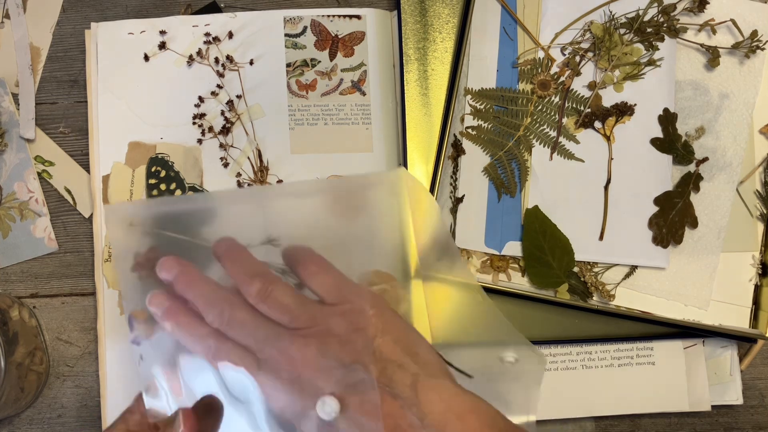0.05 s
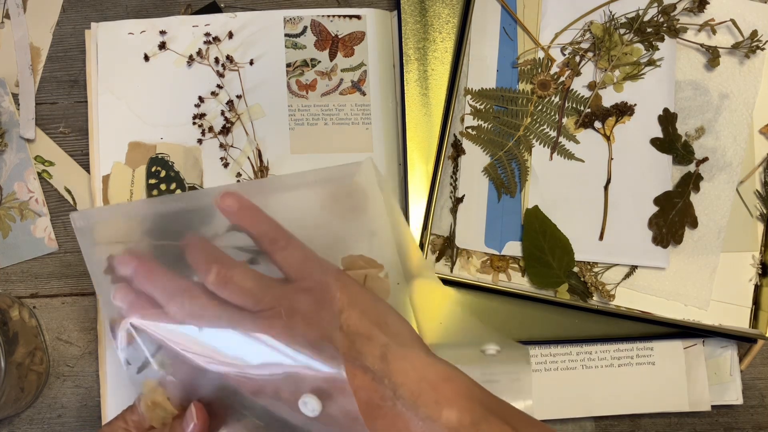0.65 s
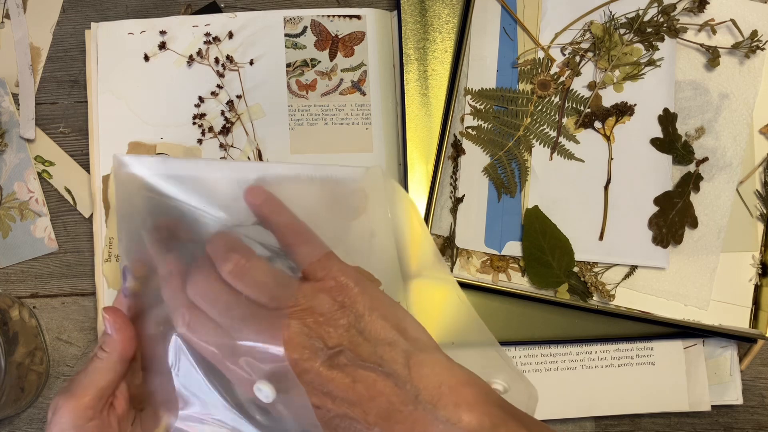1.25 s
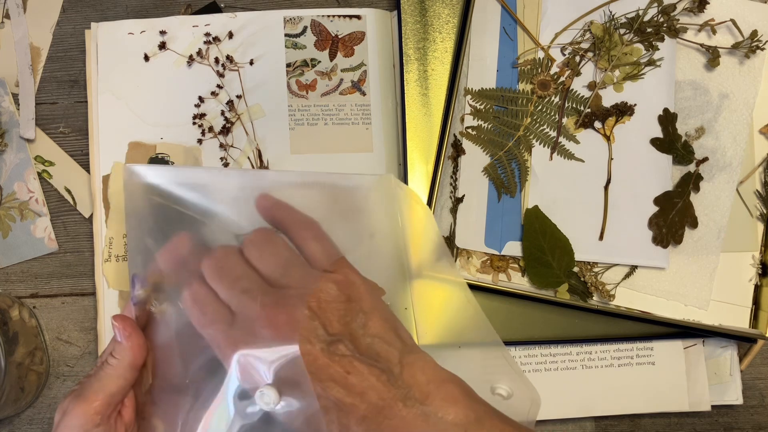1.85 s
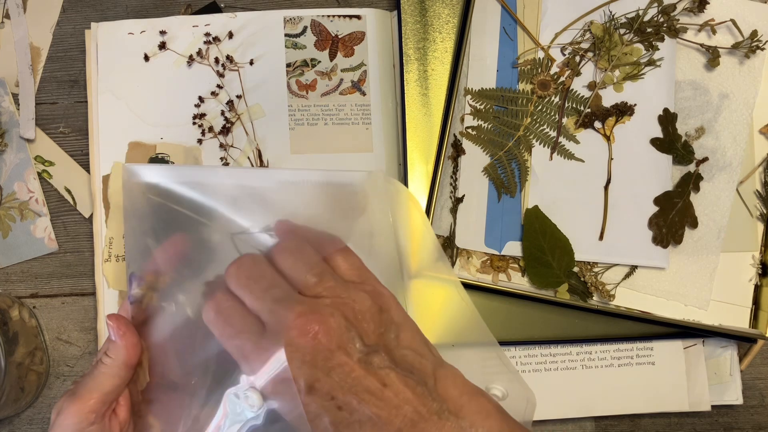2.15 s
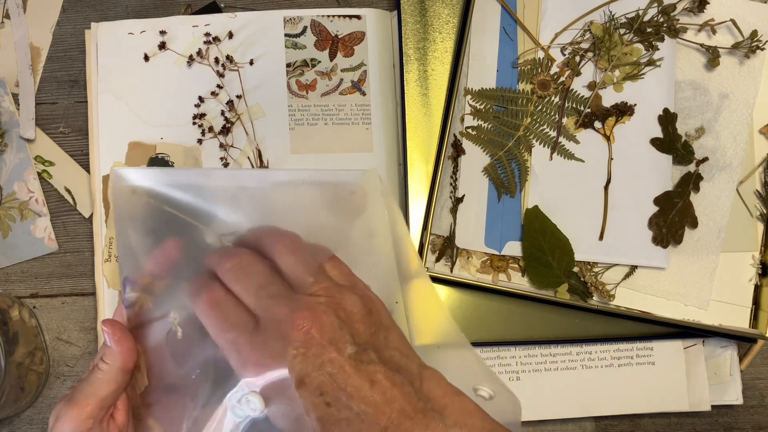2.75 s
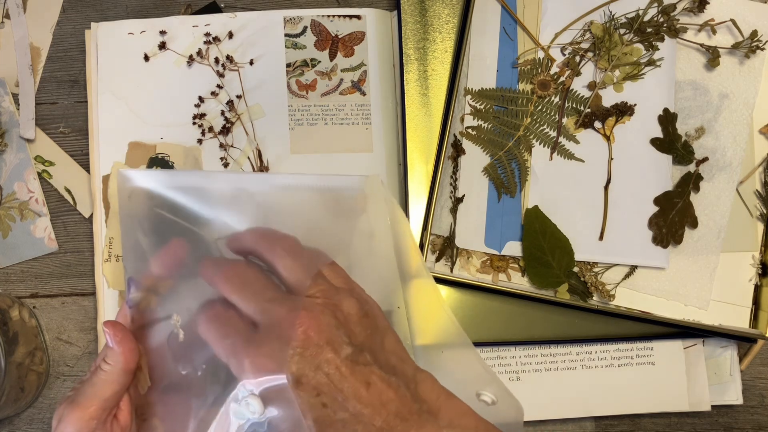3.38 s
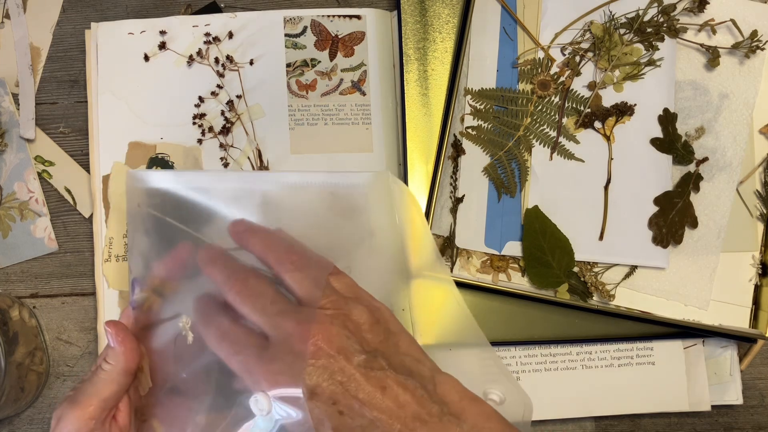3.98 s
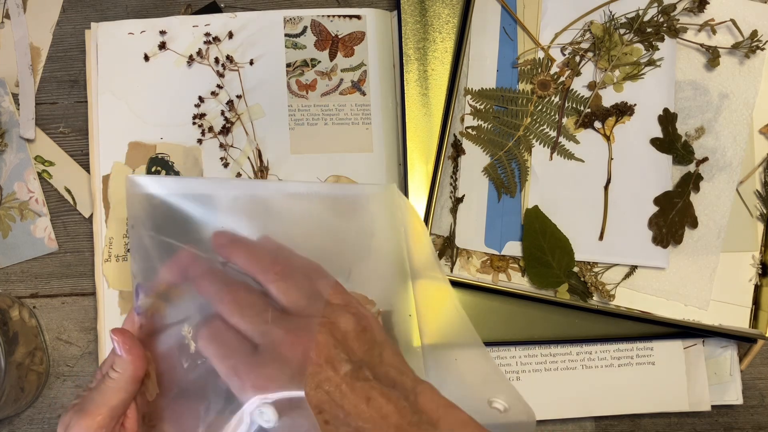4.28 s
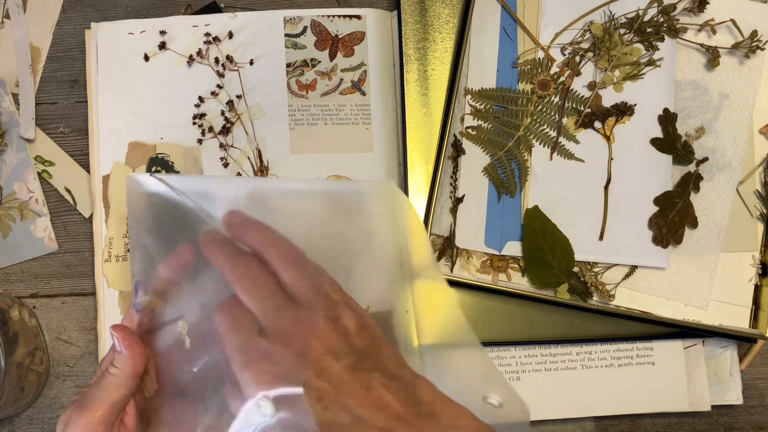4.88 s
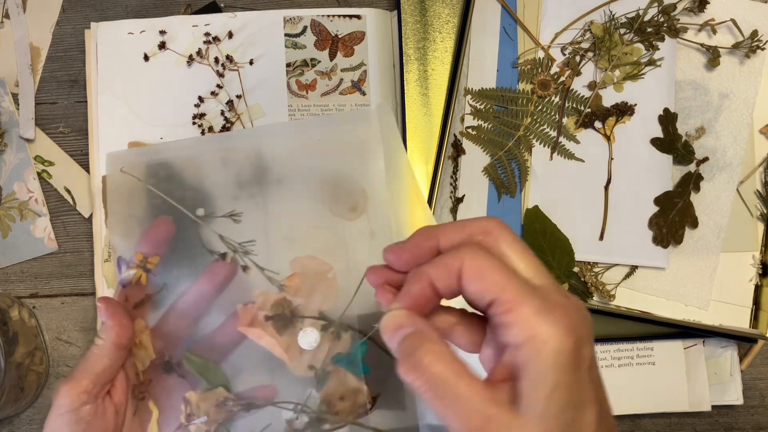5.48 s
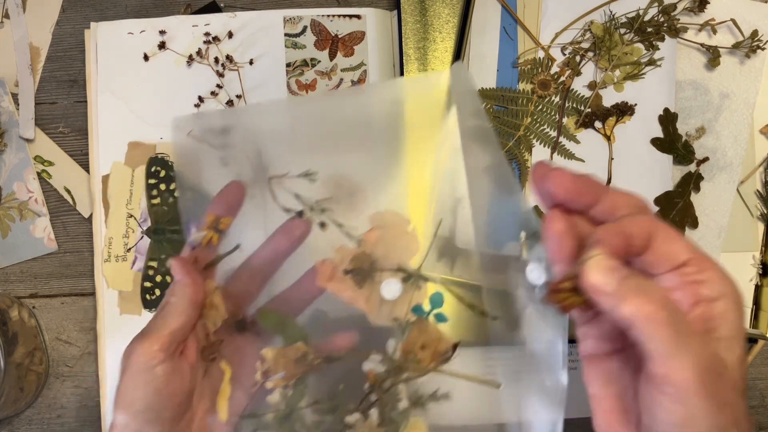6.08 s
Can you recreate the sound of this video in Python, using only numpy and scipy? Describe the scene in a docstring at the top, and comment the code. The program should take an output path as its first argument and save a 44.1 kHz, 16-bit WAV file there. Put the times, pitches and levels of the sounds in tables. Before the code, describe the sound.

Fingers slide around inside a plastic pouch, making a soft grainy hiss, sharp pops, dull taps and the brittle crackle of dried flowers.

```python
"""A stiff plastic sleeve rustles and pops as a hand feels for the dried flowers inside it.
Skin slides over the sheet in tiny slips, a grainy hiss. Dents snap through with sharp pops,
fingers land with dull taps, whole panels give a low wobble, and dry stems and petals crackle.
The table adds a hollow flutter echo and the small quiet room answers briefly.
Two closely spaced microphones listen from above."""
import sys
import numpy as np
from scipy import signal
from scipy.fft import rfft, irfft, next_fast_len
from scipy.io import wavfile
from scipy.ndimage import uniform_filter1d, map_coordinates

SR = 44100
rng = np.random.default_rng(int(sys.argv[2]) if len(sys.argv) > 2 else 0)


def store_wav(level_fs):
    """Save 16-bit WAV to argv[1]."""
    pcm = np.round(np.clip(np.atleast_2d(level_fs), -1, 1) * 32767)
    wavfile.write(sys.argv[1], SR, pcm.T.astype(np.int16))


N = 270333

# The sheet buckles. Each row: start in seconds, relative level in dB, dent pitch in Hz,
# thud offset in dB, crack offset in dB, crack pitch in Hz.
BUCKLES = [(0.054, -30.5, 1240, -12.5, -32, 2980), (0.081, -32, 1900, -7.5, -10, 3980),
           (0.238, -35, 1780, -6.5, -12.5, 2600), (0.299, -41.5, 1390, -3.5, -26, 3000),
           (0.373, -28.5, 2130, -7, -0.5, 3000), (0.3766, -24, 1400, -6, -8, 2500),
           (0.435, -15, 1480, -13, -3.5, 4930), (0.610, -29.5, 1390, -12, -22, 2000),
           (0.723, -37.5, 1270, -2.5, -6, 2470), (0.774, -34.5, 1490, -16, -4, 2350),
           (0.8624, -24, 1170, -16.5, -15, 2900), (0.8635, -28, 1840, -20, -15, 2880),
           (1.509, -24.5, 1740, -21.5, -10.5, 2500), (1.6233, -19.5, 1200, -7.5, -6, 3830),
           (1.755, -44, 1120, -5, -0.5, 2820), (1.795, -26.5, 1550, -14, -1, 3530),
           (2.097, -29, 1175, -10.5, -9, 2720), (2.241, -46.5, 1410, -7.5, -7, 2800),
           (2.3048, -24, 1106, -11, -6, 2600), (2.395, -32, 1110, -6.5, -21, 3000),
           (2.5124, -31, 1147, -16, -9.5, 2520), (2.795, -31, 1090, -22, -13, 1900),
           (2.952, -37.5, 1660, -12, -20.5, 2340), (3.107, -47, 1150, -8.5, -19, 2000),
           (3.164, -50, 1330, -1.5, -2.5, 3680), (3.243, -52.5, 1110, -10, -3, 3300),
           (3.2735, -31.5, 1680, -18, -11, 3330), (3.989, -38, 1230, -7, -15, 2940),
           (4.059, -47, 1100, -6.5, -21, 4200), (4.163, -47, 1570, -7, -15.5, 4100),
           (4.7648, -23, 1155, -18.5, -18, 3470), (4.793, -33, 1730, -11, -16.5, 2530),
           (5.14, -40.5, 2010, -13, -16, 3000), (5.182, -43, 1460, -4, -3.5, 4420),
           (5.232, -36, 865, -1, -5.5, 2460), (5.245, -45, 1850, -10, -2, 2470),
           (5.271, -52, 1070, 7, 11.5, 2800), (6.073, -43, 1430, -14.5, -5.5, 4070)]
# The bright colour of cracking plastic. Each row: frequency in Hz, gain in dB.
CRACK_SPECTRUM = [(600, -15), (1600, 1), (2600, -1), (4700, 0), (6500, -1.5), (9000, -11.5), (11000, -14.5),
                  (16000, -19.5)]


def amp(db):
    """Decibels to gain."""
    return 10 ** (np.asarray(db) / 20)


def unit(x):
    """Scale to rms 1."""
    return x / np.sqrt(np.mean(x ** 2) + 1e-20)


def sized(x):
    """Scale a short sound to the energy of one millisecond at full level."""
    return x / np.sqrt(np.sum(x ** 2) / len(x) / (SR / 1000) + 1e-20)


def along(points, hz):
    """Read (Hz, value) points on a log frequency axis."""
    knots_hz, values = np.transpose(points)
    return np.interp(np.log(hz + 1), np.log(knots_hz + 1), values)


def wobble(rate):
    """A smooth random curve, rate knots a second."""
    knots = rng.standard_normal(int(N * rate / SR) + 4)
    return map_coordinates(knots, [np.arange(N) * rate / SR])


def filtered(x, response):
    """Pass x through a complex response of frequency."""
    n = x.shape[-1]
    padded = next_fast_len(n + 4096, real=True)
    return irfft(rfft(x, padded) * response(np.fft.rfftfreq(padded, 1 / SR)), padded)[..., :n]


def causal(db):
    """The minimum-phase response with these gains: nothing sounds before the blow."""
    cepstrum = irfft(np.log(amp(db) + 1e-6))
    half = len(cepstrum) // 2
    cepstrum[1:half] *= 2
    cepstrum[half + 1:] = 0
    return np.exp(rfft(cepstrum))


def resonance(hz, centre, q):
    """One damped resonance."""
    return 1j * hz * centre / q / (centre ** 2 - hz ** 2 + 1j * hz * centre / q)


def pair(two):
    """Two unrelated signals become a left and right that are partly alike."""
    # Stereo likeness. Each row: frequency in Hz, left-right correlation.
    likeness = [(100, .99), (500, .92), (850, .7), (1300, .88), (2400, .7), (3400, .25), (4500, .65),
                (5700, .9), (6800, .65), (8500, .97), (10100, .6), (11700, .97), (13300, .45), (14500, .97)]
    turn = lambda hz: np.arccos(np.clip(along(likeness, hz), 0, 1)) / 2
    mid, side = filtered(two, lambda hz: np.array([np.cos(turn(hz)), np.sin(turn(hz))]))
    return np.array([mid + side, mid - side])


def add(track, start_s, sound):
    """Mix a sound into the track."""
    start = round(start_s * SR)
    sound = sound[:, max(0, -start):]
    part = track[:, max(0, start):][:, :sound.shape[1]]
    part += sound[:, :part.shape[1]]


def grains(n, rate, spread_db):
    """Two trains of tiny slips at random moments, a few much larger than the rest."""
    size = amp(spread_db * np.minimum(rng.exponential(size=(2, n)), 5))
    slipping = rng.random((2, n)) < rate / SR
    return unit(slipping * size * rng.choice([-1, 1], (2, n)))


def drag_levels(halt_half_width_s=0.026):
    """Rub and hiss envelopes of the back of the hand, dragging along the sleeve and halting."""
    # Each row: time in seconds, relative rub in dB, relative hiss in dB.
    drag = [(0.0, -59.5, -60.5), (0.8, -59.5, -62), (0.94, -63, -61.5), (1.019, -70, -71.5),
            (1.19, -69.5, -68), (1.72, -62.5, -61), (1.91, -69.5, -63.5), (2.059, -68, -66.5),
            (2.75, -70.5, -70.5), (3.28, -72.5, -72.5), (3.94, -79, -69), (4.13, -68.5, -68.5),
            (4.76, -68, -66), (4.93, -60.5, -60.5), (5.03, -59, -63.5), (5.16, -58.5, -62),
            (5.261, -70.5, -60), (5.38, -72, -71.5), (5.47, -101, -85), (5.54, -105, -108),
            (5.8, -92.5, -100), (5.92, -75, -84.5), (6.13, -63, -59)]
    # Halts between pushes. Each row: centre in seconds, dip in dB.
    halts = [(0.222, 10.5), (2.169, 6), (2.49, 8), (3.03, 5.5), (3.454, 11.5), (3.82, 6.5), (4.69, 8.5)]
    t = np.arange(N) / SR
    times, *levels = np.transpose(drag)
    dip_db = sum(db * np.exp(-((t - at) / halt_half_width_s) ** 2) for at, db in halts)
    return [amp(np.interp(t, times, db) - dip_db) for db in levels]


def move_level(moves, attack_s=0.043, sag_db=4, release_s=0.0055):
    """Envelope of hand movements: each takes hold, slackens over its length and lets go."""
    t, power = np.arange(N) / SR, np.zeros(N)
    for start, length, db in moves:
        rise = np.sin(np.pi / 2 * np.clip((t - start) / attack_s, 0, 1)) ** 2
        hold = amp(db - sag_db * np.clip((t - start) / length, 0, 1))
        fall = np.exp(-np.clip((t - start - length) / release_s, 0, 20))
        power += (hold * rise * fall) ** 2
    return np.sqrt(power)


def jolt_level(levels_db, rise_s=0.0067, fall_s=0.026):
    """Envelope of the sheet stirring just before each pop and settling after it."""
    out, t = np.zeros((1, N)), np.arange(-SR // 10, SR // 4) / SR
    swell = np.exp(np.minimum(t / rise_s, -t / fall_s))[None]
    for (start, *_), db in zip(BUCKLES, levels_db):
        add(out, start + t[0], amp(db) * swell)
    return out[0]


def bending_colour(x, depth_db):
    """The sheet's resonances wander as it bends: patches of pitch swell and fade."""
    spectra = signal.stft(x, nperseg=512)[2]
    patches = uniform_filter1d(rng.standard_normal(spectra.shape[1:]), size=4, axis=0)
    patches = uniform_filter1d(patches, size=9, axis=1)
    return signal.istft(spectra * amp(depth_db * unit(patches)), nperseg=512)[1][:, :N]


def friction(spectrum, rate, spread_db, tremble_db, patchy_db):
    """Dense slips coloured by the sheet; the contact pressure trembles."""
    slips = bending_colour(pair(grains(N, rate, spread_db)), patchy_db)
    coloured = filtered(slips, lambda hz: causal(along(spectrum, hz)))
    return unit(coloured * amp(tremble_db * wobble(rate=49)))


def hand_rustle(rub_pivot_db=-54, rub_growth=1.4):
    """Skin slides on matt plastic, creases tick as it passes, the sleeve shifts in the other hand."""
    # Finger pushes and shifts of the whole sleeve.
    # Each row: start in seconds, length in seconds, relative level in dB.
    finger_pushes = [(0.37, .11, -52.5), (0.78, 0.19, -57.5), (1.08, .06, -60), (1.47, 0.07, -52),
                     (1.88, .22, -67), (2.52, 0.16, -66.5), (2.77, .10, -62.5), (2.94, .04, -57.5),
                     (3.07, .05, -63), (3.18, .21, -67.5), (3.47, .24, -63), (3.89, .09, -58.5),
                     (4.06, .09, -58), (4.21, .06, -62.5), (4.30, .06, -62), (4.41, .11, -59),
                     (5.22, .08, -56), (5.96, .05, -59)]
    sleeve_shifts = [(-0.03, 0.058, -47.5), (0.38, 0.079, -65), (0.48, 0.4, -68.5), (1.63, 0.053, -51),
                     (2.215, 0.052, -56.5), (2.51, 0.075, -56), (4.93, 0.37, -65), (4.995, 0.033, -54.5),
                     (5.02, 0.186, -62.5), (5.105, .042, -53.5), (5.22, 0.1, -57.5), (5.96, 0.029, -49.5),
                     (6.08, 0.055, -61)]
    # Low handling noise, midrange rub and bright hiss. Each row: frequency in Hz, gain in dB.
    handling_spectrum = [(25, -43), (60, -11.5), (100, 0.5), (170, -1.5), (300, 5), (520, -1), (800, -2.5),
                         (1500, -19), (4000, -74)]
    rub_spectrum = [(200, -53.5), (600, -14.5), (880, -3), (1100, 2.5), (1800, 3), (2300, 0.5), (3400, -1),
                    (5000, -4.5), (8000, -12), (16000, -42.5)]
    hiss_spectrum = [(1000, -35), (3000, -3), (4400, 1), (5500, -5.5), (7200, 3.5), (10300, 0),
                     (12000, -10.5), (14000, -3.5)]
    handling = friction(handling_spectrum, rate=1200, spread_db=2.5, tremble_db=3, patchy_db=3)
    rub = friction(rub_spectrum, rate=4400, spread_db=1, tremble_db=0, patchy_db=5)
    creases = friction(rub_spectrum, rate=280, spread_db=1.5, tremble_db=0, patchy_db=7.5)
    ticks = friction(CRACK_SPECTRUM, rate=1200, spread_db=3, tremble_db=3.5, patchy_db=4)
    hiss = friction(hiss_spectrum, rate=8000, spread_db=2.4, tremble_db=1.4, patchy_db=2.1)

    drag_rub, drag_hiss = drag_levels()
    push, shift = move_level(finger_pushes), move_level(sleeve_shifts)
    # A harder push raises the rub faster than the hiss.
    pressed = amp(rub_pivot_db) * (push / amp(rub_pivot_db)) ** rub_growth
    _, pop_db, _, thud_db, crack_db, _ = np.transpose(BUCKLES)
    together = lambda *levels: np.sqrt(sum(level ** 2 for level in levels))
    handling_level = together(shift, amp(-24) * drag_rub, amp(-23) * jolt_level(pop_db + thud_db))
    rub_level = together(pressed, drag_rub, amp(-3) * shift, amp(-33) * jolt_level(pop_db))
    hiss_level = together(push, amp(1.5) * drag_hiss)
    tick_level = together(amp(-20) * jolt_level(pop_db + crack_db), amp(-9) * shift)
    return (amp(-1) * handling_level * handling
            + rub_level * (rub + amp(-5) * creases)
            + amp(1) * hiss_level * hiss
            + tick_level * ticks)


def blow(t, t60, run_db=-4, run_rise_s=0.0012, creak_db=-22, creak_rise_s=0.004):
    """The sheet creaks under load, snaps at t = 0, and a ragged run of smaller creases follows."""
    after = np.maximum(t, 0)
    slips = pair(grains(len(t), rate=5000, spread_db=2))
    run = slips * amp(-60 * after / t60) * (1 - np.exp(-after / run_rise_s))
    creak = slips * (t < 0) * np.exp(-np.abs(t) / creak_rise_s)
    return ((t == 0) + amp(run_db) * run / np.linalg.norm(run[0])
            + amp(creak_db) * creak / np.linalg.norm(creak[0]))


def dent_tone(hz, pitch, crack_db):
    """A dent rings around its pitch; a soft one is rounder, a sharp one wakes a higher mode."""
    cutoff_hz = 3.8 * pitch * amp(0.2 * crack_db)
    rolloff = causal(-10 * np.log10(1 + (hz / cutoff_hz) ** 10))
    main_mode = resonance(hz, pitch, q=2.13) ** 2 * rolloff
    upper_mode = resonance(hz, 1.65 * pitch, q=4) ** 2
    return main_mode + np.minimum(amp(crack_db + 3), 0.6) * upper_mode


def snap_tone(hz, spectrum, pitch, q, boost_db):
    """A broad snap with one short resonance standing out of it."""
    return causal(along(spectrum, hz)) * (1 + amp(boost_db) * resonance(hz, pitch, q))


def pops_and_taps(dispersion=0.0462, dent_lag_s=0.0013, crack_lag_s=0.0013):
    """Dents snap through with a ring, a thud and a crack; finger taps are the same with less crack."""
    # Fingers bump the sleeve. Each row: start in seconds, relative level in dB.
    taps = [(0.001, -33), (0.114, -27.5), (0.547, -49.5), (1.23, -48.5), (1.617, -40), (1.674, -44),
            (1.94, -53), (2.09, -45.5), (2.223, -57.5), (2.292, -32.5), (2.65, -50.5), (2.788, -47),
            (3.732, -66), (3.934, -45.5), (4.129, -55.5), (5.027, -43.5), (5.054, -50.5)]
    tap_hz, tap_thud_db, tap_crack_db, tap_crack_hz = 1061, -2.5, -28, 3000
    tap_rows = [(*tap, tap_hz, tap_thud_db, tap_crack_db, tap_crack_hz) for tap in taps]
    # The dull body of each hit. Each row: frequency in Hz, gain in dB.
    thud_spectrum = [(25, -35), (60, -13.5), (150, -11), (330, -3.5), (530, 3.5), (750, 0), (1200, -24.5),
                     (3000, -76)]
    lead_in = SR // 40
    out, t = np.zeros((2, N)), (np.arange(SR // 7) - lead_in) / SR
    # Bending waves travel slower at low pitch, so each pop falls in pitch.
    chirp = lambda hz: np.exp(-2j * np.pi * dispersion * 2 * (np.sqrt(hz) - hz / np.sqrt(2 * SR)))
    for start, db, pitch, thud_db, crack_db, crack_hz in BUCKLES + tap_rows:
        dent = filtered(blow(t, t60=0.035), lambda hz: dent_tone(hz, pitch, crack_db) * chirp(hz))
        thud = filtered(blow(t, t60=0.071), lambda hz: causal(along(thud_spectrum, hz)) * chirp(hz))
        crack = filtered(blow(t, t60=0.016),
                         lambda hz: snap_tone(hz, CRACK_SPECTRUM, crack_hz, q=8.7, boost_db=16.5))
        at = start + dent_lag_s - lead_in / SR
        add(out, at, amp(db) * sized(dent) + amp(db + thud_db + 1) * sized(thud))
        add(out, at + crack_lag_s, amp(db + crack_db - 1) * sized(crack))
    return out


def panel_flexes(t60=0.094, rise_s=0.0054, gain_db=8):
    """A wide panel of the sleeve is shaken unevenly and wobbles around its own low pitch."""
    # Each row: start in seconds, relative level in dB, pitch in Hz.
    flexes = [(0.009, -48.5, 145), (0.407, -44, 86), (1.65, -52.5, 178), (1.676, -51, 287),
              (1.801, -44.5, 248), (2.553, -50, 355), (3.171, -62, 271), (3.744, -76, 188),
              (3.955, -58, 357), (4.17, -68, 119), (4.794, -50, 280), (5.2, -58, 91), (5.289, -55, 332)]
    out, t = np.zeros((2, N)), np.arange(SR // 6) / SR
    envelope = amp(-60 * t / t60) * (1 - np.exp(-t / rise_s))
    for start, db, pitch in flexes:
        shake = pair(rng.standard_normal((2, len(t)))) * envelope
        ring = filtered(shake, lambda hz: resonance(hz, pitch, q=7) * resonance(hz, pitch, q=0.23))
        add(out, start, amp(db + gain_db) * sized(ring))
    return out


def flower_crackles(rise_s=0.00038):
    """Each dry petal or stem breaks in a quick run of tiny fractures, coloured by its own pitch."""
    # Each row: start in seconds, level in dB, seconds to fade by 30 dB, pitch in Hz.
    breaks = [(0.1103, -38, 0.022, 8980), (0.201, -39.5, 0.007, 4124), (0.24, -31, 0.0067, 14000),
              (0.335, -48.5, .005, 3900), (0.397, -26.5, 0.037, 8690), (0.402, -25.5, 0.02, 14500),
              (0.8658, -23.5, 0.0062, 7990), (0.885, -33.5, 0.05, 4600), (0.9354, -45, 0.024, 7005),
              (1.512, -41, 0.032, 9380), (2.515, -43.5, 0.005, 9260), (2.955, -47.5, 0.013, 10210),
              (3.165, -47, 0.005, 7600), (4.066, -45, 0.025, 8070), (4.164, -46.5, 0.016, 8450),
              (4.415, -42, 0.025, 6800), (4.464, -39.5, 0.032, 7470), (4.7406, -41.5, 0.013, 7200),
              (4.771, -41.5, 0.011, 14820), (4.791, -41.5, 0.034, 8380), (5.094, -48.5, 0.054, 2760),
              (5.4, -47.5, 0.014, 4770), (5.9706, -47, 0.06, 7300)]
    # The brittle colour of the petals. Each row: frequency in Hz, gain in dB.
    petal_spectrum = [(500, -28), (2000, 4), (4200, -0.5), (9000, -3), (12000, -10.5), (15500, -6.5)]
    out, t = np.zeros((2, N)), np.arange(SR // 8) / SR
    for start, db, fade_s, pitch in breaks:
        envelope = amp(-30 * t / fade_s) * (1 - np.exp(-t / rise_s))
        fractures = pair(grains(len(t), rate=3700, spread_db=4)) * envelope
        snap = filtered(fractures, lambda hz: snap_tone(hz, petal_spectrum, pitch, q=1.9, boost_db=5))
        add(out, start, amp(db) * sized(snap))
    return out


def table_flutter(x, trip_s=0.0056, trip_db=-12.5, dull_hz=1480):
    """Sound bounces between the table and a surface above, which gives it a hollow colour."""
    trip = lambda hz: amp(trip_db) * np.exp(-2j * np.pi * hz * trip_s) / (1 + (hz / dull_hz) ** 2)
    return filtered(x, lambda hz: 1 / (1 - trip(hz)))


def room_reverb(x):
    """The walls answer briefly; each frequency dies at its own speed."""
    # Each row: frequency in Hz, seconds to fade by 60 dB.
    decay_times = [(100, 0.18), (300, 0.23), (1000, 0.22), (4000, 0.044), (14000, 0.033)]
    hz, t, spectra = signal.stft(rng.standard_normal((2, SR // 2)), SR, nperseg=256)
    decay = amp(-60 * t / along(decay_times, hz)[:, None])
    tail = signal.istft(spectra * decay, SR, nperseg=256)[1]
    tail = np.pad(tail, ((0, 0), (SR // 200, 0)))  # 5 ms pre-delay
    return signal.fftconvolve(x, tail / np.linalg.norm(tail[0]), axes=1)[:, :N]


def room_tone(level_db=-85):
    """The faint steady air of the room."""
    # Each row: frequency in Hz, gain in dB.
    air_spectrum = [(20, -23), (55, -2), (120, -6.5), (330, -17.5), (700, -24), (2000, -24.5),
                    (9000, -23.5), (16000, -35.5)]
    noise = pair(rng.standard_normal((2, N)))
    return amp(level_db) * unit(filtered(noise, lambda hz: amp(along(air_spectrum, hz))))


def scene(wet_db=-16):
    """The sleeve and its flowers, close by, with a little of the room."""
    sleeve = pops_and_taps() + panel_flexes() + flower_crackles() + hand_rustle()
    return table_flutter(sleeve) + amp(wet_db) * room_reverb(sleeve) + room_tone()


def record(dry, top_hz=16050):
    """The two microphones differ in level and arrival time; nothing passes above the band limit."""
    # Stereo balance. Each row: frequency in Hz, left minus right in dB.
    balance = [(400, 0.5), (900, -1.5), (1400, -1), (2500, -3), (4700, -2.5), (5800, -2.5), (9000, 1),
               (15000, 0.5)]
    # Arrival difference. Each row: frequency in Hz, radians by which the left leads.
    phase_lead = [(0, 0), (500, -.4), (800, -.95), (1150, -.05), (2900, .25), (4300, 1.7), (5600, 3.14),
                  (7900, 6.15), (9300, 6.4), (11200, 9.3), (12700, 9.7), (13900, 12.45), (16000, 12.57)]

    def microphones(hz):
        phase = np.interp(hz, *np.transpose(phase_lead))
        left = amp(along(balance, hz) / 2) * np.exp(0.5j * phase)
        return np.array([left, 1 / left]) * (hz < top_hz)
    return filtered(dry, microphones)


dry = scene()
out = record(dry)
store_wav(out)
```